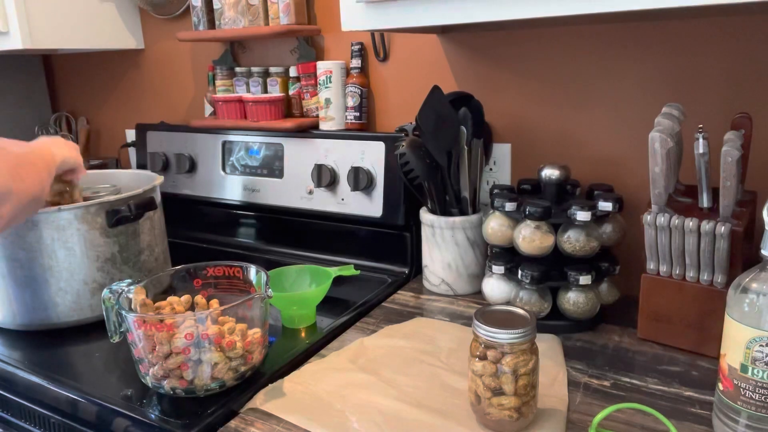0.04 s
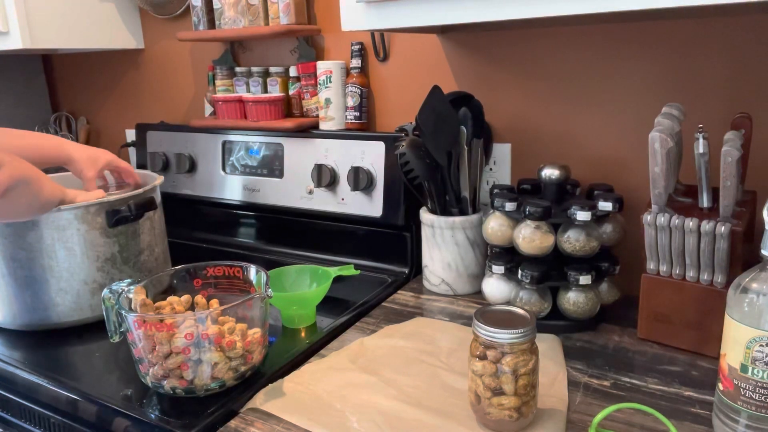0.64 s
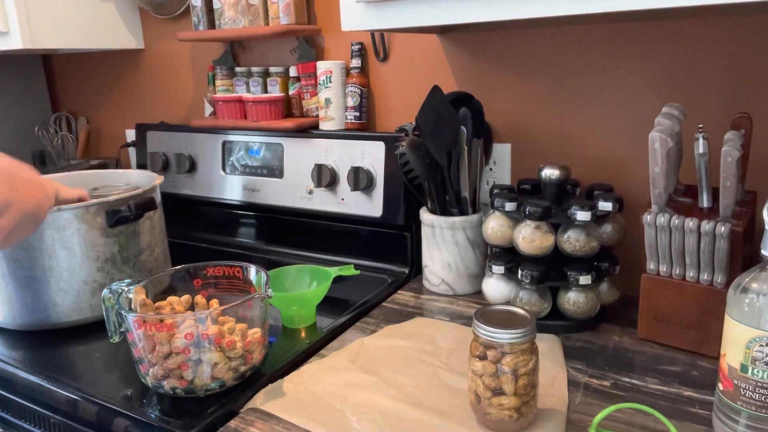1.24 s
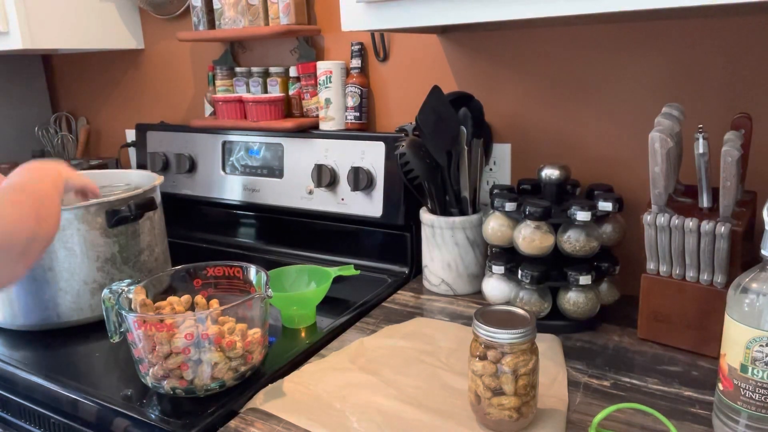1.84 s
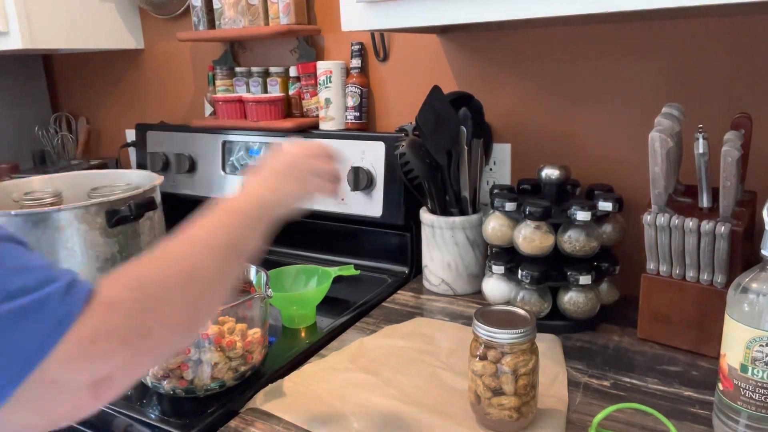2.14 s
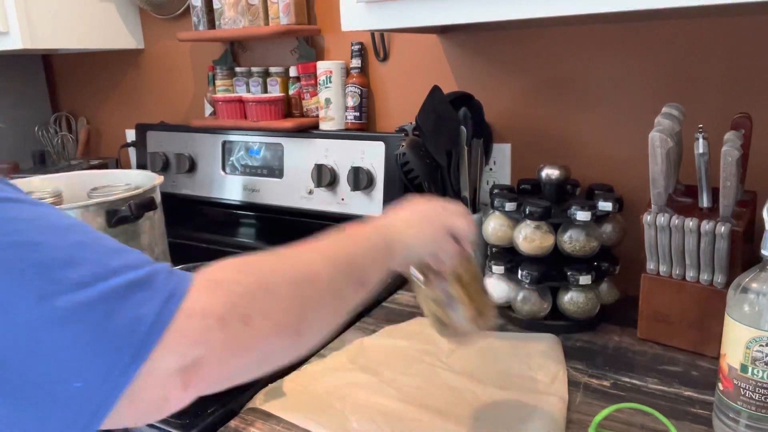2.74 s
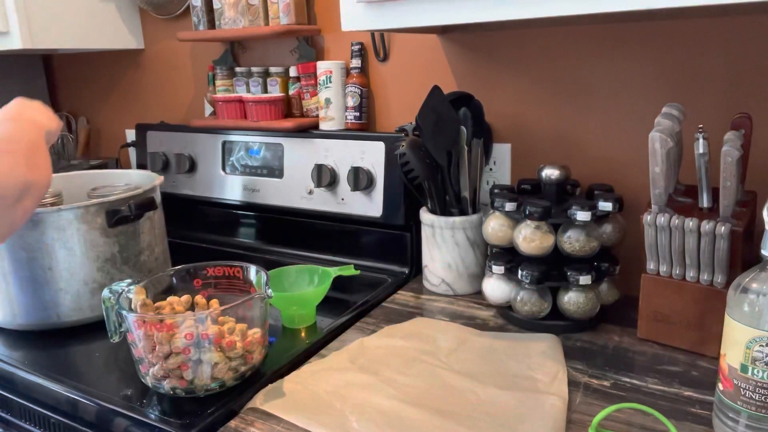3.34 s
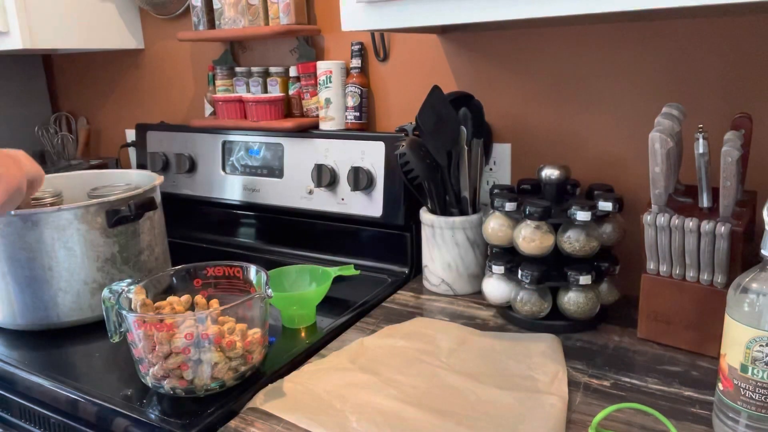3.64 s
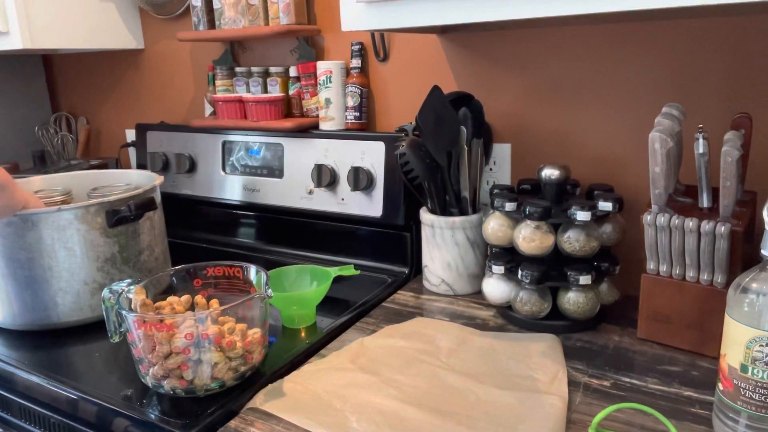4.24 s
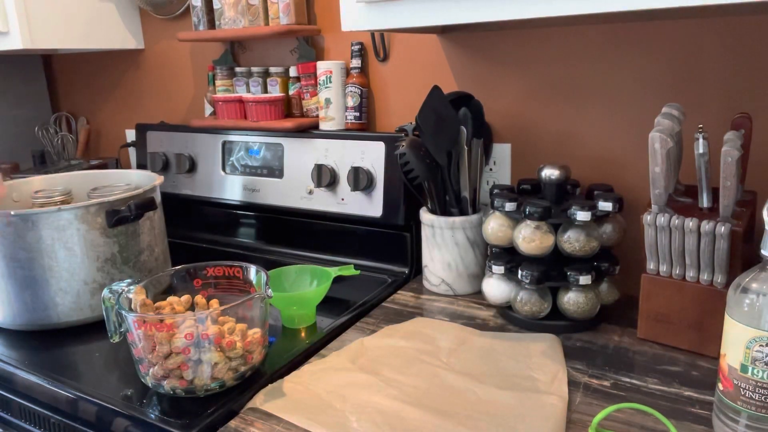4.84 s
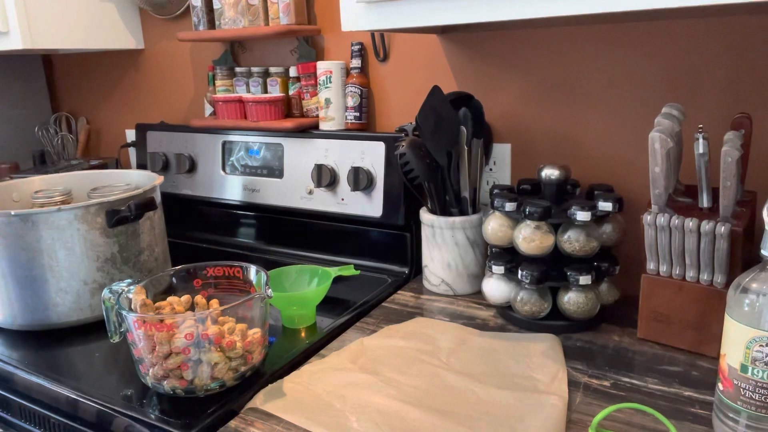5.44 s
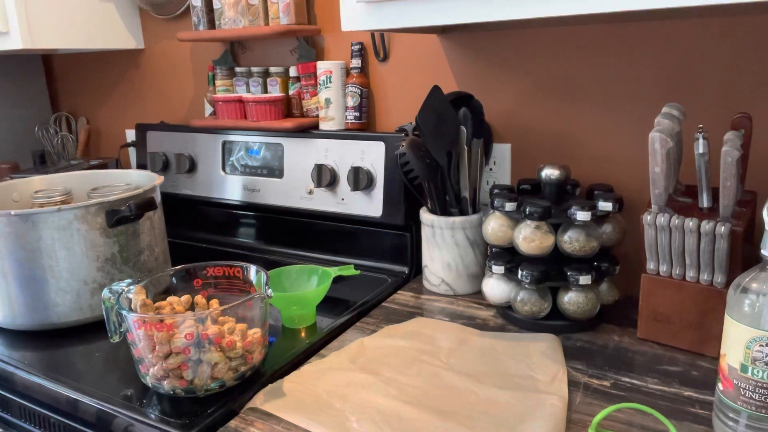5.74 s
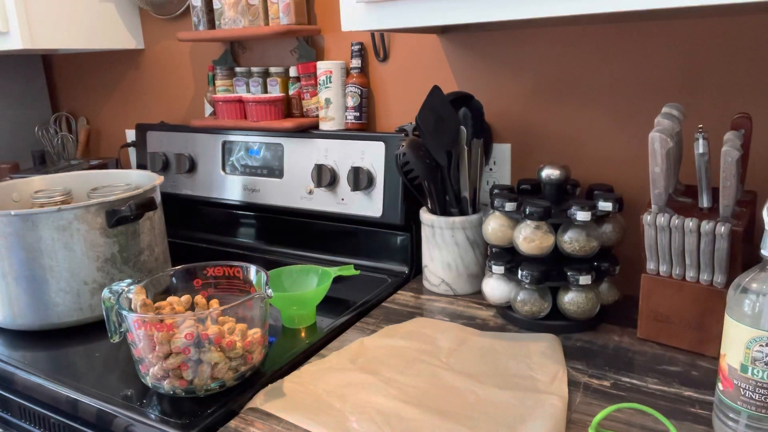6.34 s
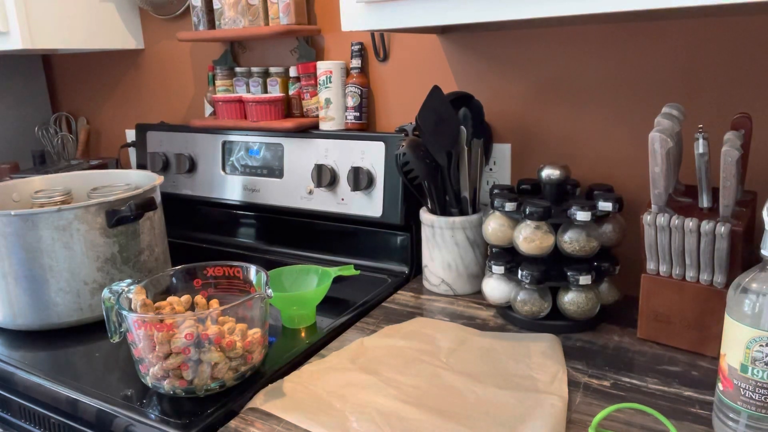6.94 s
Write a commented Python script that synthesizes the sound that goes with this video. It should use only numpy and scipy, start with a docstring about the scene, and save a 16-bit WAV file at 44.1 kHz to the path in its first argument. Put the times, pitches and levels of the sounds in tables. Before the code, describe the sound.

A faint appliance hum with fan noise runs throughout in a small kitchen, heard from the counter. After a light rub, filled glass jars clink and knock in a big metal pot of water from about 0.5 to 1.1 seconds, with hollow notes and low thuds through the stove top. More clinks come around 1.5 seconds, and the pot rings briefly. A lull follows, with a soft sleeve swish near 2.5 seconds and very faint, thin chirps around 3.3. From 3.6 seconds another jar knocks into the pot, rocks quickly on its rim and settles, with a short scrape and bright clink at 4.3. Fingers tick and rub lightly on lids from about 4.5 to 6 seconds, with a small wooden knock at 5.5. A louder wooden bump booms briefly at 6.7 seconds, further off to the left, and a faint scrape ends it.

```python
"""Knocks, clinks and hollow notes: filled glass jars are lowered one by one into a big metal pot of water.
Each contact rings the glass, sounds the water-loaded pot and thuds through the stove top. One jar rocks
on its rim; hands rub and tick on lids; later, wood bumps further off and something scrapes.
A sleeve rustles, a thin tone chirps and an appliance hums in the small kitchen.
A phone with two microphone ports listens from the counter."""
import sys
import numpy as np
from scipy import signal
from scipy.fft import rfft, irfft, next_fast_len
from scipy.io import wavfile
from scipy.ndimage import uniform_filter1d, map_coordinates

SR = 44100
rng = np.random.default_rng(int(sys.argv[2]) if len(sys.argv) > 2 else 0)


def log_audio(samples):
    """Write samples as a 16-bit WAV file to the path given in sys.argv[1]."""
    # one column per channel
    frames = np.atleast_2d(samples).T
    # limit to full scale, then quantise
    limited = np.clip(frames, -1, 1)
    pcm = np.round(limited * 32767).astype(np.int16)
    wavfile.write(sys.argv[1], SR, pcm)


N = 313110
TIME_S = np.arange(N) / SR
AGE_S = np.arange(int(.6 * SR)) / SR  # time since a blow
PORT_LAG_S = 7.4 / SR  # the left port hears the stove first

# Modes of the water-loaded pot. Each row: frequency in Hz, level in dB, t60 in seconds.
POT_MODES = [(357.7, 4, 0.14), (432.4, 5.5, 0.13), (506, 0, 0.1), (554, -5, 0.07), (635.4, 1.5, 0.21),
             (774, 4.5, 0.11), (841.6, 6, 0.11), (954, -4.5, 0.05), (1035, 4.5, 0.06), (1124, 3.5, 0.081),
             (1197, 4, 0.094), (1246, -3.5, 0.05)]


def jars(rock_count=4, rock_gap_s=.022, rock_shrink=.51, rock_loss_db=1.3):
    """Single knocks, and a jar rocking ever faster on its rim."""
    # Jar contacts. Each row: start in seconds, rattle t60 in seconds, clink in dB, tilt in dB/octave,
    # wall ring in dB, its centre in Hz, pot in dB, its centre in Hz, hollow note in dB, stove thud in dB.
    # Levels are relative.
    knocks = [(.004, 0.087, -59, -4, -49.5, 2660, -56.5, 560, -68, -54.5),
              (.545, 0.044, -39, -2, -38.5, 2520, -34, 560, -33.5, -50.5),
              (.584, 0.042, -42, -4.5, -48, 3300, -63.5, 690, -56, -53),
              (.615, 0.05, -57.5, 0.5, -63, 1900, -41.5, 730, -44, -49),
              (.686, 0.1, -44.5, -7, -64, 1910, -60, 500, -57, -54),
              (0.717, .05, -58, -19, -69, 1786, -46, 457, -67, -53),
              (.758, 0.061, -52.5, -9, -79, 1825, -58.5, 730, -60, -57),
              (.789, 0.067, -51, -5, -50.5, 1750, -39.5, 648, -44.5, -54),
              (0.889, 0.04, -71, -20, -58.5, 1740, -46.5, 950, -55, -70),
              (.942, 0.037, -35.5, -1, -35.5, 4800, -52, 523, -32, -33),
              (.947, 0.11, -31.5, -8.5, -27.5, 1767, -34, 630, -30, -34.5),
              (1.058, 0.038, -40.5, -4.5, -47.5, 2300, -35.5, 860, -34, -63),
              (1.439, 0.2, -57, -7.5, -57.5, 2340, -64, 835, -78, -54),
              (1.502, 0.2, -50.5, -5.5, -59, 2000, -66, 810, -77, -56),
              (1.544, 0.27, -46.5, -8.5, -50, 1900, -44, 770, -68, -50.5),
              (1.609, 0.04, -34, -3, -42, 3640, -36, 860, -50, -41),
              (1.755, 0.15, -56, -5.5, -78, 1800, -57.5, 690, -67, -60),
              (1.867, 0.09, -74, -14, -80, 1800, -74, 1000, -85, -77),
              (1.962, 0.058, -76, -5, -77, 1810, -73, 1020, -87, -72),
              (2.03, 0.27, -73, -1.5, -81, 1770, -67, 1020, -80, -75.5),
              (3.626, 0.034, -43, -6.5, -52, 1650, -32.5, 1070, -47.5, -60),
              (3.879, 0.037, -45, -3, -51, 2230, -41, 720, -31.5, -60.5),
              (4.012, 0.16, -63.5, -3.5, -69, 2400, -53.5, 839, -69, -59.5),
              (4.277, 0.125, -37, -3, -45.5, 5230, -50, 880, -54, -63),
              (4.284, 0.086, -46.5, -13, -41.5, 2220, -51, 900, -50.5, -59),
              (4.295, 0.21, -46.5, -20, -50, 2130, -40, 810, -50, -44)]
    # First contact of the rocking jar. Same columns.
    rocking = [(3.707, 0.045, -48.5, 4.1, -44, 2470, -33.5, 1010, -53.5, -50.5)]
    out = np.zeros((2, N))
    for start_s, *knock in knocks:
        add(out, start_s, contact(*knock))
    for start_s, *knock in rocking:
        for k in range(rock_count):
            add(out, start_s, amp(-rock_loss_db * k) * contact(*knock))
            start_s += rock_gap_s * rock_shrink ** k
    return out


def contact(t60_s, clink_db, tilt_db_oct, walls_db, walls_hz, pot_db, pot_hz, hollow_db, thud_db):
    """One contact clinks, rings the glass, sounds the water and pot, and thuds through the stove."""
    return (amp(clink_db + 3.5) * clink(t60_s, tilt_db_oct)
            + amp(walls_db) * jar_walls(walls_hz)
            + amp(hollow_db) * hollow_note()
            + amp(pot_db) * pot_knock(pot_hz, t60_s)
            + amp(thud_db) * stove_thud())


def clink(t60_s, tilt_db_oct):
    """Glass rattles briefly; each contact has its own length and brightness."""
    # Clink spectrum. Each row: frequency in Hz, density in dB.
    spectrum = [(300, -9.5), (700, -1), (1000, -0.5), (1350, -1.5), (1800, 0.5), (2800, 0.5), (4000, -1),
                (5400, -4.5), (7400, -6), (9000, -9), (12500, -17), (15000, -26), (16000, -42)]
    colour_db = lambda hz: along(spectrum, hz) + tilt_db_oct * np.log2(np.clip(hz, 1500, 9000) / 2200)
    rise_s = .00094 + .06 * t60_s  # a longer rattle builds up more slowly
    return burst(colour_db, t60_s, rise_s, chatter_db=1.5, ripple_db=2)


def jar_walls(centre_hz):
    """The struck spot decides which wall modes answer; the filling damps the high ones fast."""
    # Glass wall modes. Each row: frequency in Hz, level in dB.
    wall_modes = [(1567, -7.5), (1752, 2), (1889, 1), (2045, -4.5), (2250, -5), (2390, -5.5), (2600, -4.5),
                  (2844, 1), (3210, 2), (3330, -0.5), (3520, -6), (3850, 2.5), (4086, -4.5), (4474, -3.5),
                  (4883, -1), (5150, 4), (5320, 2), (5520, -1.5)]
    mode_hz, mode_db = np.transpose(wall_modes)
    t60_s = .17 * np.minimum(1750 / mode_hz, 1) ** 1.9
    modes = np.transpose([mode_hz, mode_db, t60_s])
    spot_db = focus(centre_hz, loss_db_oct2=60, max_loss_db=22)
    return ring(modes, rise_s=.005, vary_db=1.5, spread_rad=.8, weight_db=spot_db)


def hollow_note(hz=702):
    """A full jar standing in water gives one note: a short swell, then a weak lingering ring."""
    swell = fade(.07, rise_s=.009) ** 2
    linger = amp(-29) * fade(.22, rise_s=.008)
    return note(hz, swell + linger)


def pot_knock(centre_hz, rattle_t60_s):
    """The pot answers in one region of its modes, with clear ones and quickly damped ones."""
    # Spectrum of the damped modes. Each row: frequency in Hz, density in dB.
    spectrum = [(150, -28.5), (350, -4.5), (500, 5.5), (800, 5), (1200, -1.5), (1700, 10), (4000, -20),
                (16000, -72)]
    region_db = focus(centre_hz, loss_db_oct2=24, max_loss_db=18)
    clear = ring(POT_MODES, rise_s=.0018, vary_db=4.5, spread_rad=1, weight_db=region_db)
    colour_db = lambda hz: along(spectrum, hz) + region_db(hz)
    clunk = burst(colour_db, .84 * rattle_t60_s, rise_s=.0076, chatter_db=3, ripple_db=4)
    return amp(-2) * clear + amp(-6) * clunk


def stove_thud():
    """The stove top under the pot rings low."""
    # Stove top modes. Each row: frequency in Hz, level in dB, t60 in seconds.
    stove_modes = [(125, -2, 0.056), (162.3, -9, 0.0784), (186, 0, 0.12), (221.5, -5.5, 0.17),
                   (249, -1, 0.056), (311, -0.5, 0.21), (370, 3, 0.12), (424, 0, 0.27)]
    return ring(stove_modes, rise_s=.001, vary_db=2, spread_rad=.13)


def free_pot(t60_ratio=1.6):
    """The hand lets go of a jar and stops damping the pot: a few neighbouring modes sing on."""
    # Releases. Each row: start in seconds, level in dB, ring centre in Hz.
    releases = [(1.611, -32, 674)]
    modes = [(hz, db, t60_ratio * t60_s) for hz, db, t60_s in POT_MODES]
    out = np.zeros((2, N))
    for start_s, db, centre_hz in releases:
        region_db = focus(centre_hz, loss_db_oct2=70)
        tones = ring(modes, rise_s=.004, vary_db=1, spread_rad=.3, weight_db=region_db)
        add(out, start_s, amp(db) * tones)
    return out


def bumps():
    """Wood knocks and its panel booms; deep thumps pass through pot, stove and floor."""
    # Wooden bumps. Each row: start in seconds, knock in dB, boom in dB, t60 in seconds, tilt in dB/octave.
    wood_bumps = [(5.495, -46, -58, 0.046, -10), (6.604, -51, -79, 0.5, 1), (6.673, -34.5, -38, 0.15, 0.5)]
    # Knock spectrum. Each row: frequency in Hz, density in dB.
    spectrum = [(70, -11.5), (200, -18), (400, 4), (650, -5.5), (950, -4), (1300, -16), (1800, -16.5),
                (2600, -20.5), (3300, -32), (8000, -60), (15000, -69)]
    # Panel modes. Each row: frequency in Hz, level in dB, t60 in seconds.
    panel_modes = [(125.4, 7, 0.27), (147, 2, .15), (313, 1.5, 0.14), (383, 3, 0.14), (448, 2, .16),
                   (472, 9.5, 0.19), (570, 2, 0.09), (697, -7, 0.22), (866, -7, 0.31), (1020, 7.5, 0.1),
                   (2560, -4, .06)]
    # Deep thumps. Each row: start in seconds, level in dB, frequency in Hz.
    thumps = [(.555, -42, 353), (.6, -51, 185), (.715, -50.5, 195), (0.789, -47.5, 62.4),
              (1.001, -49.5, 76), (1.063, -42.5, 63.4), (1.277, -48, 49.3), (4.394, -45.5, 49)]
    out = np.zeros((2, N))
    for start_s, knock_db, boom_db, t60_s, tilt_db_oct in wood_bumps:
        colour_db = lambda hz: along(spectrum, hz) + tilt_db_oct * np.log2(np.clip(hz, 500, 4000) / 500)
        knock = burst(colour_db, t60_s, rise_s=.0018, chatter_db=.5, ripple_db=2.5)
        boom = ring(panel_modes, rise_s=.031, vary_db=1, spread_rad=.51)
        add(out, start_s, amp(knock_db) * knock + amp(boom_db) * boom)
    for start_s, db, hz in thumps:
        add(out, start_s, amp(db) * note(hz, fade(.045, rise_s=.011)))
    return out


def lid_ticks():
    """Fingers on lids: small bright contacts with no body behind them."""
    # Ticks. Each row: start in seconds, relative level in dB, tilt in dB/octave, t60 in seconds.
    ticks = [(0.254, -54, -3, 0.092), (0.703, -58, 0, 0.06), (2.207, -62, -23.5, 0.032),
             (2.39, -67.5, 1.5, 0.43), (2.516, -65, -6, 0.027), (4.575, -60.5, -9, 0.23),
             (4.824, -62, -16.5, 0.33), (4.965, -56, -7, 0.4), (5.5, -53.5, -9.5, 0.48),
             (5.823, -55, -8, 0.1), (5.886, -58, -13, 0.17)]
    # Tick spectrum. Each row: frequency in Hz, density in dB.
    spectrum = [(700, -11), (2000, -13.5), (4000, -8.5), (7500, -4.5), (12500, -3), (15000, -11),
                (16000, -15.5)]
    out = np.zeros((2, N))
    for start_s, db, tilt_db_oct, t60_s in ticks:
        treble_db = lambda hz: tilt_db_oct * np.log2(np.clip(hz, 3000, 14000) / 3000)
        colour_db = lambda hz: along(spectrum, hz) + treble_db(hz)
        tick = burst(colour_db, t60_s, rise_s=.0015, chatter_db=2, ripple_db=3)
        add(out, start_s, amp(db - 1) * tick)
    return out


def sliding():
    """Glass and hands rub with an uneven grain; light scrapes ring in a few resonances."""
    # Rubs. Each row: peak time in seconds, relative level in dB, length in seconds.
    rubs = [(-0.003, -57.5, 0.45), (0.436, -73, 0.97), (0.607, -59, 0.87), (1.023, -58, 0.78),
            (1.616, -66.5, 0.99), (2.523, -63.5, 0.4), (3.636, -54.5, 0.13), (3.898, -57, 0.32),
            (6.031, -62, 0.54), (6.44, -68.5, 0.49), (6.664, -67.5, 0.52)]
    # Scrapes, some just ahead of a blow. Same columns.
    scrapes = [(0.549, -39, 0.04), (4.278, -37, 0.024), (6.659, -55.5, 0.042), (7.027, -65.5, 0.92)]
    # Rub spectrum. Each row: frequency in Hz, density in dB.
    spectrum = [(150, 1), (400, 9), (700, 1), (1200, -5), (2000, -8), (4000, -10.5), (7500, -17),
                (12500, -22), (15000, -38)]
    # Scrape resonances. Each row: centre in Hz, width in Hz, level in dB.
    resonances = [(1670, 160, 1.5), (2160, 26, 9.5), (2476, 34, 11), (2950, 1400, 0.5)]
    grain = unit(amp(.83 * wobble(35) + .66 * wobble(540)))
    rub = amp(4) * strokes(rubs) * noise(N, lambda hz: along(spectrum, hz))
    power = lambda hz: sum(amp(db) ** 2 * hump(hz, *band_hz) for *band_hz, db in resonances)
    scrape = strokes(scrapes) * noise(N, lambda hz: 10 * np.log10(power(hz)))
    return grain * (rub + scrape)


def hand_crackle(slips_per_s=900, spread_db=3.5):
    """A rubbing hand makes countless tiny slips over a little smooth hiss."""
    # Rubs. Each row: peak time in seconds, relative level in dB, length in seconds.
    rubs = [(5.922, -64.5, 0.062), (5.994, -59, .45)]
    # Slip spectrum. Each row: frequency in Hz, density in dB.
    spectrum = [(200, -12), (500, 4), (1100, 3), (2200, -2), (4000, -9.5), (7500, -11.5), (12500, -13.5),
                (15000, -34)]
    onsets = rng.random(N) < slips_per_s / SR
    slips = onsets * rng.standard_normal((2, N)) * amp(spread_db * rng.standard_normal(N))
    grains = unit(filtered(slips, lambda hz: amp(along(spectrum, hz))))
    hiss = noise(N, lambda hz: along(spectrum, hz))
    return strokes(rubs) * (grains + .5 * hiss)


def sleeve():
    """Cloth swishes softly in the low mids as the arm reaches across the counter."""
    # Swishes. Each row: peak time in seconds, level in dB, length in seconds.
    swishes = [(2.45, -69, 1), (2.828, -67.5, 0.35)]
    # Cloth spectrum. Each row: frequency in Hz, density in dB.
    spectrum = [(250, -30), (450, 7.5), (650, 10), (950, 0.5), (1500, -25.5), (4000, -46), (16000, -59)]
    cloth = noise(N, lambda hz: along(spectrum, hz))
    flutter = unit(amp(.88 * wobble(13)))
    return strokes(swishes) * cloth * flutter


def squeak(pitch_hz=1194):
    """Faint, thin, wavering chirps with a weak octave."""
    # Chirps. Each row: peak time in seconds, level in dB, length in seconds.
    chirps = [(3.288, -72, 0.15), (3.365, -76, 0.069), (3.496, -76, 0.15)]
    phase = 2 * np.pi * np.cumsum(pitch_hz * (1 + .014 * wobble(45))) / SR
    return strokes(chirps) * unit(np.sin(phase) + amp(-14) * np.sin(2 * phase))


def appliance(whistle_hz=3167, whistle_width_hz=220):
    """Slightly unsteady hum lines over fan noise; a thin whistle swells and sinks."""
    # Fan spectrum. Each row: frequency in Hz, density in dB.
    spectrum = [(13, -73), (22, -30), (48, 3), (87, -4), (125, -9), (223, -10), (286, 0), (328, -18.5),
                (409, -10), (560, -20.5), (680, -20), (930, -22.5), (1200, -29), (1500, -35), (3600, -37.5),
                (6000, -48), (8030, -48.5), (13000, -46), (16000, -55.5)]
    # Hum lines. Each row: frequency in Hz, rms level in dB.
    hum_lines = [(59.2, -62), (118.4, -61.5), (290.7, -78), (646.0, -88), (716.0, -80), (990.5, -79)]
    # Humps in the fan noise. Each row: centre in Hz, width in Hz, level in dB.
    fan_humps = [(297, 41, -65), (8050, 1300, -76.5)]
    # Whistle envelope. Each row: time in seconds, level in dB.
    whistle_levels = [(0, -84.5), (2.4, -82), (2.85, -84), (3.25, -81), (3.6, -81), (7.1, -81)]
    out = amp(-58 + .44 * wobble(4.9)) * noise(N, lambda hz: along(spectrum, hz))
    for line_hz, db in hum_lines:
        peak = np.sqrt(2) * amp(db + .39 * wobble(8.8))
        line = peak * np.sin(2 * np.pi * line_hz * TIME_S + .24 * wobble(5.5))
        out += from_left([line, line])
    whistle_db = np.interp(TIME_S, *np.transpose(whistle_levels))
    for *band_hz, db in fan_humps + [(whistle_hz, whistle_width_hz, whistle_db)]:
        out += amp(db + 2.3 * wobble(4.1)) * noise(N, lambda hz: 20 * np.log10(hump(hz, *band_hz)))
    return out


def kitchen(x, block=SR // 4, build_up_s=.0015):
    """Room reverberation; each block of sound gets its own noise tail."""
    # Room decay. Each row: frequency in Hz, t60 in seconds.
    decay_times = [(120, 0.6), (400, 0.31), (1000, 0.27), (3000, 0.34), (7000, 0.3), (14000, 0.17)]
    out = np.zeros((2, N))
    for start in range(0, N, block):
        hz, age_s, bands = signal.stft(noise(len(AGE_S), np.zeros_like), SR, nperseg=256)
        decay = np.exp(-np.log(1000) * age_s / along(decay_times, hz)[:, None])
        tail = signal.istft(bands * decay, SR, nperseg=256)[1][:, :len(AGE_S)]
        tail *= 1 - np.exp(-AGE_S / build_up_s)
        tail /= np.linalg.norm(tail[0])
        add(out, start / SR, signal.fftconvolve(x[:1, start:start + block], tail, axes=1))
    return out


def burst(colour_db, t60_s, rise_s, chatter_db, ripple_db):
    """Countless short-lived modes of uneven strength, shaken by rebounds a millisecond or two apart."""
    jitter = rng.standard_normal(len(AGE_S))
    rebounds = unit(uniform_filter1d(uniform_filter1d(jitter, size=70), size=3))
    knots = rng.standard_normal(90)
    ripple = lambda hz: np.interp(np.sqrt(hz / hz[-1]), np.linspace(0, 1, len(knots)), knots)
    modes = noise(len(AGE_S), lambda hz: colour_db(hz) + ripple_db * ripple(hz))
    return unit_blow(modes * fade(t60_s, rise_s) * amp(chatter_db * rebounds))


def ring(modes, rise_s, vary_db, spread_rad, weight_db=lambda hz: 0):
    """Modes struck at random strengths; each reaches the two ports at its own phase."""
    hz, db, t60_s = np.transpose(modes)[:, :, None]
    strength, phase, skew = rng.standard_normal((len(hz), 3)).T[:, :, None]
    envelope = amp(db + vary_db * strength + weight_db(hz)) * fade(t60_s, rise_s)
    width_hz = .003 * hz  # touching jars and water widen each mode
    drift = np.cumsum(rng.standard_normal(len(AGE_S))) * np.sqrt(2 * np.pi * width_hz / SR)
    left = 2 * np.pi * (hz * AGE_S + phase) + drift
    right = left - 2 * np.pi * hz * PORT_LAG_S - spread_rad * skew
    return unit_blow(np.sum(envelope * np.sin([left, right]), axis=1))


def note(hz, envelope):
    """One pitch under an envelope, later on the right."""
    arrival_s = np.array([[0], [PORT_LAG_S]])
    return unit_blow(envelope * np.sin(2 * np.pi * hz * (AGE_S - arrival_s)))


def noise(size, colour_db):
    """Coloured stereo noise of rms 1, partly alike at the two ports and later on the right."""
    # Likeness of the ports. Each row: frequency in Hz, coherence from 0 to 1.
    coherence = [(60, 0.77), (130, 0.76), (290, 0.54), (640, 0.052), (2000, 0.054), (5000, 0.2), (8000, 1)]
    angle = lambda hz: np.arccos(np.clip(along(coherence, hz), -1, 1)) / 2
    response = lambda hz: amp(colour_db(hz)) * [np.cos(angle(hz)), np.sin(angle(hz))]
    mid, side = filtered(rng.standard_normal((2, size)), response)
    right = filtered(mid - side, lambda hz: np.exp(-2j * np.pi * hz * PORT_LAG_S))
    return unit(np.array([mid + side, right]))


def strokes(rows, rise_share=.34, end_drop_db=19.5, roundness=1.19):
    """Summed gain of strokes: each swells to its peak and dies away more slowly."""
    gain = np.zeros(N)
    for peak_s, db, length_s in rows:
        offset = (TIME_S - peak_s) / length_s
        from_peak = np.maximum(-offset / rise_share, offset / (1 - rise_share))
        gain += amp(db - end_drop_db * from_peak ** roundness)
    return gain


def fade(t60_s, rise_s):
    """A quick rise and an exponential decay."""
    return np.exp(-np.log(1000) * AGE_S / t60_s) * (1 - np.exp(-AGE_S / rise_s))


def focus(centre_hz, loss_db_oct2, max_loss_db=np.inf):
    """A weighting in dB that falls with the squared octaves from a centre."""
    return lambda hz: -np.minimum(loss_db_oct2 * np.log2(hz / centre_hz) ** 2, max_loss_db)


def hump(hz, centre_hz, width_hz):
    """A resonance curve of height 1."""
    return 1 / (1 + (2 * (hz - centre_hz) / width_hz) ** 2)


def from_left(x, lag_samples=8):
    """Sound from far left reaches the right port later still."""
    return np.array([x[0], np.pad(x[1], (lag_samples, 0))[:N]])


def wobble(knots_per_s):
    """A smooth random curve."""
    knots = rng.standard_normal(int(N * knots_per_s / SR) + 4)
    return map_coordinates(knots, [TIME_S * knots_per_s])


def filtered(x, response):
    """Apply a frequency response."""
    size = x.shape[-1]
    padded = next_fast_len(size + 8192)
    return irfft(rfft(x, padded) * response(np.fft.rfftfreq(padded, 1 / SR)), padded)[..., :size]


def along(points, hz):
    """Read (Hz, value) points on a log axis."""
    point_hz, values = np.transpose(points)
    return np.interp(np.log(hz + 1), np.log(point_hz + 1), values)


def add(track, start_s, sound):
    """Mix a sound into the track."""
    part = track[:, round(start_s * SR):][:, :sound.shape[1]]
    part += sound[:, :part.shape[1]]


def amp(db):
    """Decibels to gain."""
    return 10 ** (np.asarray(db) / 20)


def unit(x):
    """Scale to rms 1."""
    return x / np.sqrt(np.mean(x ** 2) + 1e-20)


def unit_blow(x, span_s=.03):
    """Scale a stereo blow to the energy of rms 1 held for span_s."""
    return x / np.sqrt(np.sum(x ** 2) / (2 * span_s * SR) + 1e-20)


def scene():
    """Everything sounds in one room; the bumps come from further left than the stove."""
    # Port balance. Each row: frequency in Hz, left minus right in dB.
    balance = [(60, -1.8), (250, 0.5), (500, -1.1), (1000, -1), (2000, -0.2), (4000, 0.5), (12000, 0.9)]
    direct = jars() + free_pot() + lid_ticks() + from_left(bumps())
    direct += sliding() + hand_crackle() + sleeve() + squeak()
    heard = direct + amp(-5) * kitchen(direct) + appliance()
    return filtered(heard, lambda hz: amp(along(balance, hz) * np.array([[.5], [-.5]])))


def record(dry):
    """The phone thins the deepest bass and keeps nothing above its band limit."""
    low_cut_hz, top_hz = 36, 15900
    thinned = signal.sosfilt(signal.butter(4, low_cut_hz, "highpass", fs=SR, output="sos"), dry)
    return filtered(thinned, lambda hz: hz < top_hz)


dry = scene()
out = record(dry)
log_audio(out)
```